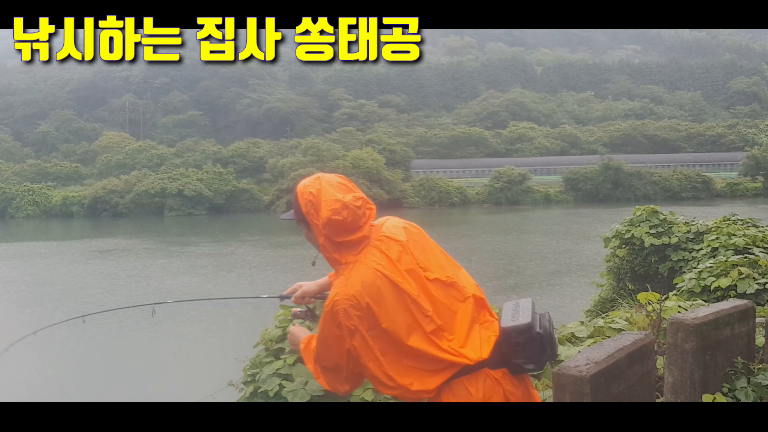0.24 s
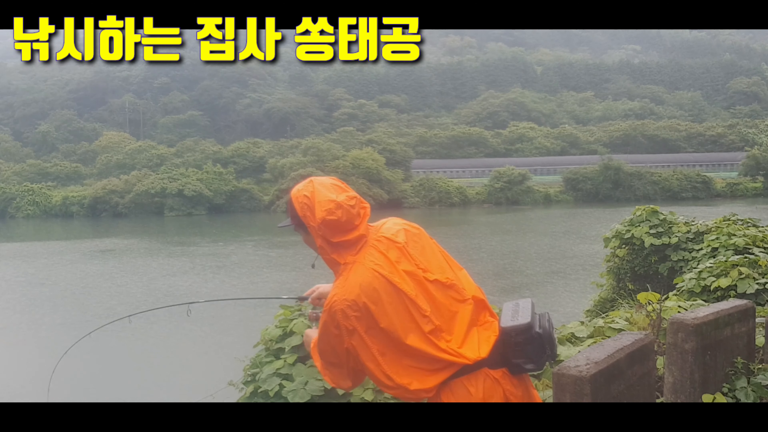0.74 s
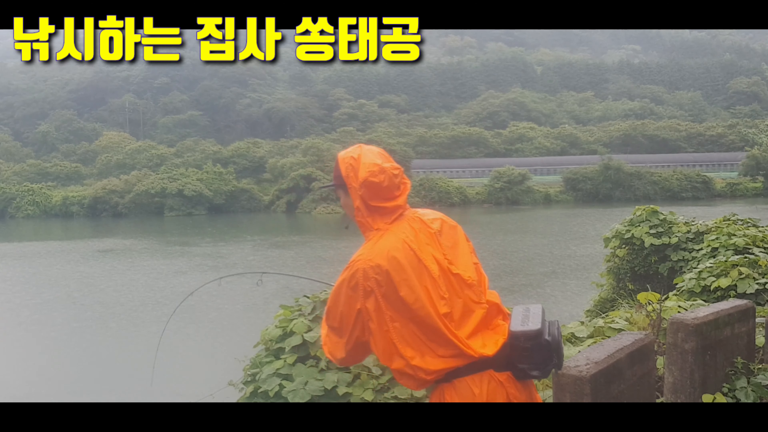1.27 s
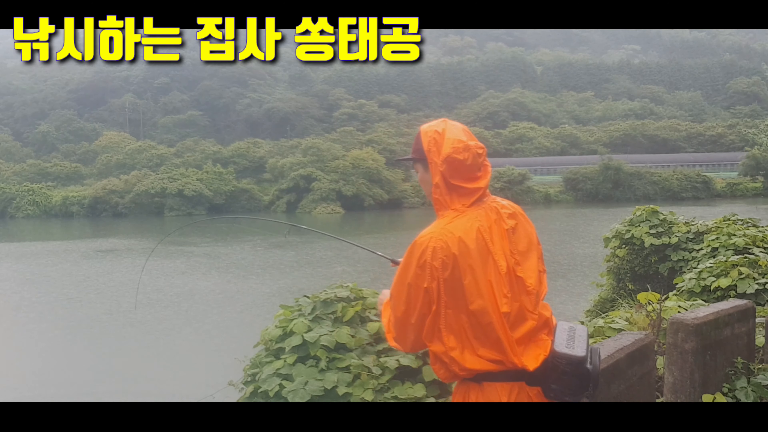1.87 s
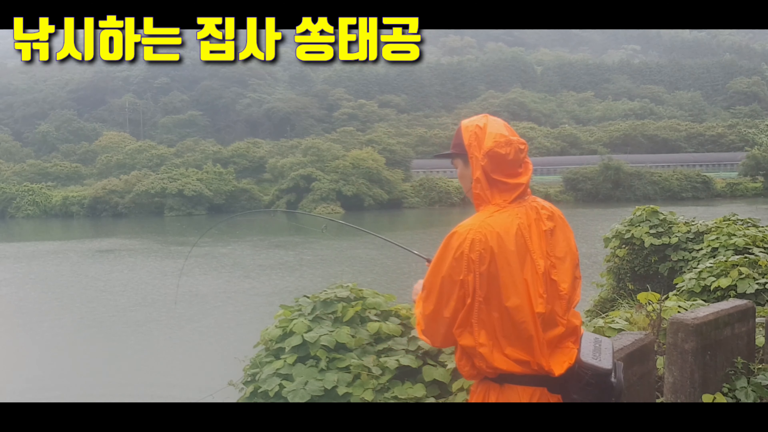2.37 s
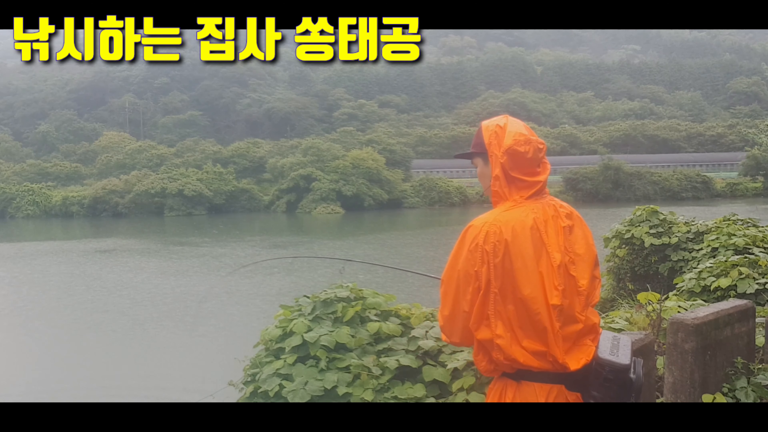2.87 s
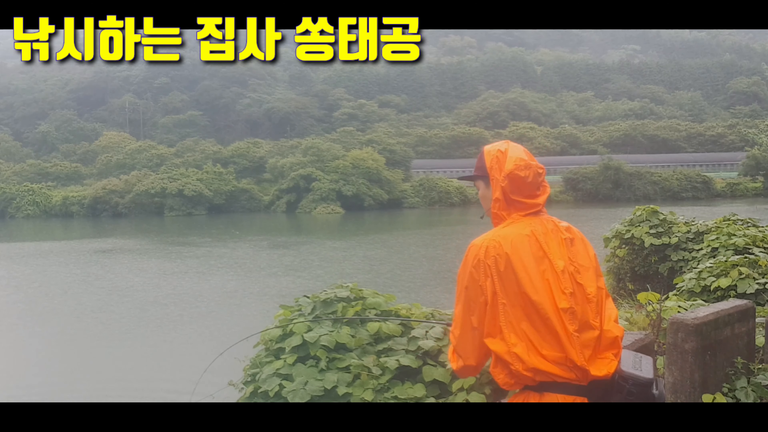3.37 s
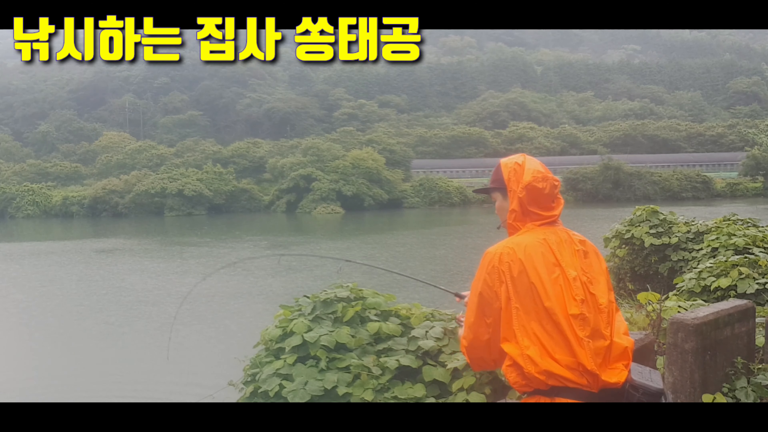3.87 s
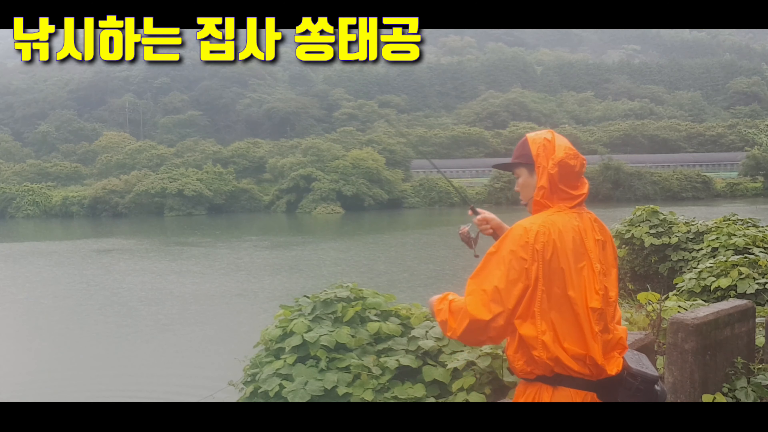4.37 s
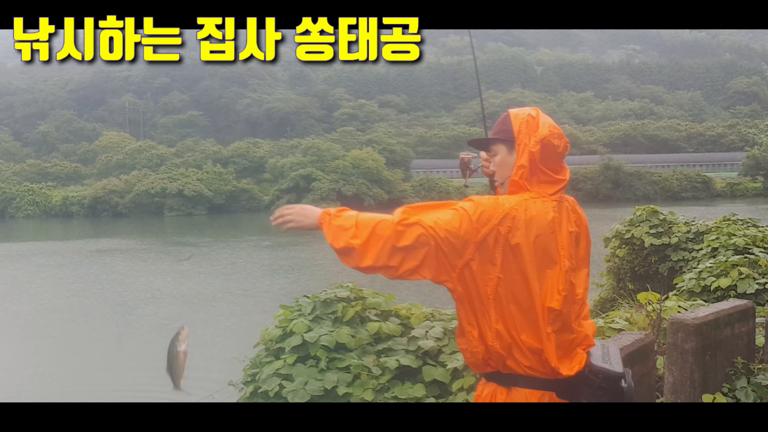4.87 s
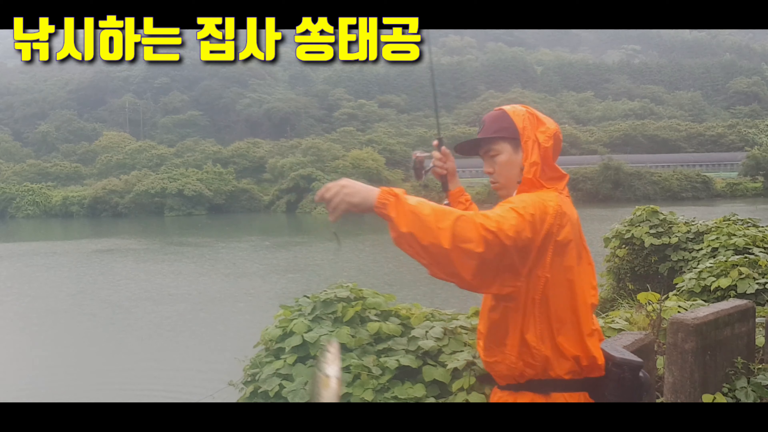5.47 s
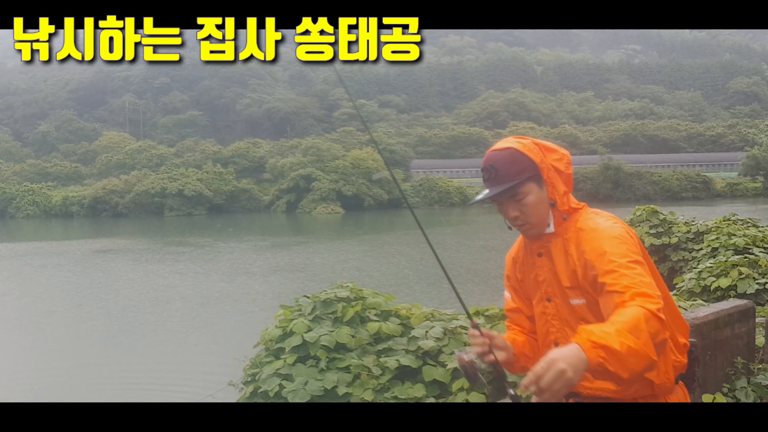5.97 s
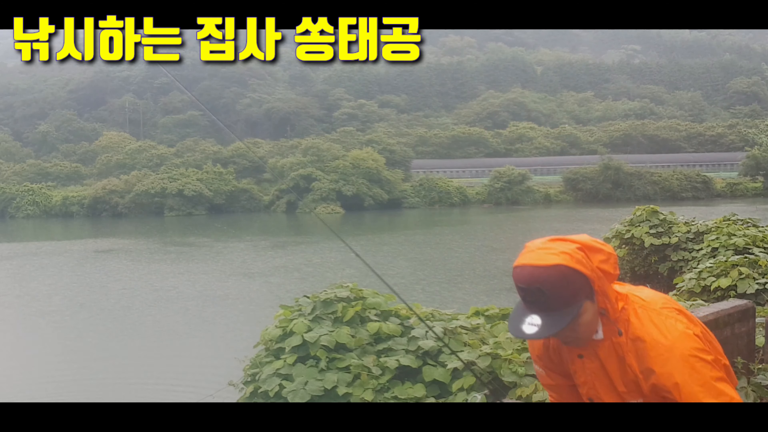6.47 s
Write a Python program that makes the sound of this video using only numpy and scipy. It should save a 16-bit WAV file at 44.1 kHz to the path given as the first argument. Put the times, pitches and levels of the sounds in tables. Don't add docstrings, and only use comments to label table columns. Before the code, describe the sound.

Steady rain throughout, almost constant in level, muffled and watery around the left microphone and lighter, hissier at the right. From 0 s a fishing reel's drag clicker chatters in thin, very bright metallic ticks with a faint spool ring, uneven until 0.5 s; a short gap, then it resumes at 0.75 s and accelerates to a fine fast buzz at about 1.3-1.7 s. It eases to a steady whirr, slows to rattling near 2.7-2.9 s, runs again at 3.05-3.6 s, then breaks into scattered single ticks until 4.8 s. Raindrops strike the camera housing very close: a knock at 0.44, sharp loud taps at 0.86 and 1.02, a cluster around 2.8-3.2, one at 3.7 with a tiny faint plink soon after, lighter taps through 4-6, then loud 6.2 and a duller 6.55. Soft low thuds underneath.

```python
import sys
import numpy as np
from scipy import signal
from scipy.fft import rfft, irfft
from scipy.io import wavfile
from scipy.ndimage import uniform_filter1d

SR = 44100
rng = np.random.default_rng(int(sys.argv[2]) if len(sys.argv) > 2 else 0)


def gain_from_db(level_db):
    decades = np.asarray(level_db, float) / 20
    return 10 ** decades


def dump_mix(stems):
    frames = np.atleast_2d(stems).T
    limited = np.clip(frames, -1, 1)
    pcm = np.round(limited * 32767).astype(np.int16)
    wavfile.write(sys.argv[1], SR, pcm)


N = 296352

# f/Hz, level/dB per Hz
LEFT_PORT = [(28, -108), (60, -95), (170, -93), (300, -89), (750, -78.5), (1050, -83.5), (1700, -77),
             (2800, -83), (3800, -91), (5000, -101), (7800, -127), (10700, -114), (13500, -107),
             (15300, -107)]
# f/Hz, level/dB per Hz
RIGHT_PORT = [(28, -112), (60, -101), (300, -99), (520, -93), (750, -94), (1150, -95), (1750, -99),
              (2200, -96), (5000, -96.5), (6500, -103), (7800, -109), (10700, -96), (12000, -98),
              (15300, -105)]
# f/Hz, share/1
SHARED_RAIN = [(60, 0.91), (300, 0.58), (600, 0.44), (1200, 0.11), (2500, 0.62), (6000, 0.028)]
# t/s, level/dB
SHOWER = [(0.0, -51), (0.3, -51), (0.88, -51), (1.29, -53), (2.28, -51.5), (2.58, -53), (3.61, -51),
          (3.93, -52), (4.3, -52), (5.28, -51.5), (5.67, -51.5), (6.72, -50.5)]
# t/s, upper peak level/dB, upper f/Hz, lower peak level/dB, lower f/Hz
HEAVY_DROPS = [(0.4396, -28.5, 2010, -27.5, 740), (0.8625, -10.5, 2370, -39.5, 1180),
               (1.0152, -9.5, 1970, -16, 1030), (2.801, -20, 2620, -29.5, 1270),
               (2.936, -35.5, 2246, -31, 592), (3.1592, -17, 1760, -29, 920),
               (3.1652, -25.5, 3130, -35, 1900), (3.1693, -35, 1960, -38, 780),
               (3.68, -25, 2430, -27.5, 1260), (6.1817, -10.5, 2320, -36, 940),
               (6.5515, -18, 2420, -26.5, 1290)]
# t/s, upper peak level/dB, upper f/Hz
LIGHT_DROPS = [(0.3496, -33, 2130), (1.6446, -36, 2030), (1.8256, -34, 2210), (2.39, -33, 2200),
               (2.891, -33, 1840), (3.2234, -32, 2050), (3.755, -34.5, 2140), (4.2812, -31, 2360),
               (4.687, -38, 1970), (5.059, -30.5, 2310), (5.236, -31, 1980), (5.6212, -29.5, 2120),
               (5.945, -37, 3520)]
# t/s, peak level/dB, f/Hz
SOFT_DROPS = [(0.019, -64, 427), (0.289, -53.5, 343), (0.706, -51.5, 322), (1.365, -56.5, 320),
              (1.619, -77, 323), (2.299, -56, 320), (2.939, -36, 288), (2.954, -39, 219),
              (2.975, -41.5, 202), (4.652, -57, 367), (5.103, -55, 305), (5.165, -55, 423),
              (5.25, -55.5, 318), (5.302, -52, 266), (5.94, -50.5, 323), (6.033, -70, 390),
              (6.091, -52, 332), (6.332, -58, 400), (6.456, -53, 247), (6.59, -56, 260)]
# t/s, peak level/dB
ROCKING_DROPS = [
    (0.019, -59),
    (0.439, -48.5),
    (1.017, -46.5),
    (1.628, -64),
    (2.497, -60),
    (2.937, -42.5),
    (5.151, -64),
    (5.815, -58),
    (6.465, -61),
    (6.548, -70),
]
# f/Hz, level/dB, t60/s
SHELL_MODES = [(260, -5, 0.035), (352, -0.5, 0.068), (440, 8, 0.015), (573, 12, 0.025)]
# t/s, peak level/dB
SINGLE_CLICKS = [(2.9474, -54), (2.962, -41), (2.9743, -48), (3.5833, -44), (3.6075, -46), (3.626, -44),
                 (3.6463, -41), (3.6592, -54), (3.6794, -42), (3.6877, -45), (3.7135, -41), (3.7406, -41),
                 (3.7656, -41), (3.7779, -55), (3.8375, -38), (3.851, -45), (4.0144, -43), (4.2063, -39),
                 (4.2305, -57), (4.312, -36), (4.3354, -54), (4.5959, -39), (4.6029, -52), (4.7876, -39),
                 (4.8061, -58)]
# t/s, click rate/(1/s), click level/dB, spool ring level/dB
LINE_PULLS = [
    [(.001, 70.7, -42, 2), (.13, 97, -48.5, 9), (.18, 176, -44.5, 5), (.28, 120, -41, 0),
     (.34, 75, -40.5, 2), (.42, 90, -39, -1.5), (.51, 57, -52, .1)],
    [(.75, 73, -41, -5), (.8, 105, -39, -5), (.86, 107, -39, -1), (.92, 65, -42.5, .1), (1., 190, -53, 5),
     (1.1, 250, -56, -5)],
    [(1.1, 233, -54.5, 0), (1.28, 277, -48.5, 3), (1.44, 315, -48, -4), (1.52, 315, -51.5, -7),
     (1.7, 250, -48, 0.5), (2.05, 165, -44.5, -3.5)],
    [(2.05, 176, -49, -4), (2.2, 176, -44.5, 2), (2.4, 189, -45.5, -4), (2.57, 170, -45, 0),
     (2.66, 74, -43, -7), (2.9, 74, -43, -4)],
    [(3.05, 140, -49, -10), (3.14, 200, -52.5, -2), (3.22, 192, -53, -3), (3.4, 80, -43, 0),
     (3.575, 120, -42.5, -7)],
]
# from f/Hz, to f/Hz, level/dB
SPRING_BANDS = [(10500, 11700, -4.5), (13600, 15000, 0.5), (14870, 15700, 5)]
# f/Hz, level/dB
FAINT_FLOOR = [(4500, -13.), (5000, -9.5), (6500, -9.5), (8000, -7), (9300, -6), (10200, -8), (13500, -28)]


def on_log(table, hz):
    table_hz, value = np.array(table)[:, 0], np.array(table)[:, 1]
    return np.interp(np.log(hz + 1), np.log(table_hz), value)


def in_time(table):
    s, *columns = np.transpose(table)
    return [np.interp(np.arange(N) / SR, s, c) for c in columns]


def unit(x):
    return x / np.sqrt(np.mean(x ** 2))


def walk(rate_hz):
    k = int(SR / rate_hz)
    held = np.repeat(rng.standard_normal(size=400), k)[:N]
    w = uniform_filter1d(uniform_filter1d(held, k), k)
    return w / w.std()


def ring(x, hz, t60_s):
    pole = np.exp(2j * np.pi * min(hz, 0.45 * SR) / SR - np.log(1000) / (t60_s * SR))
    return signal.lfilter([1], [1, -pole], x).imag


def pulses(s, db):
    x = np.zeros(N)
    at = np.clip((np.asarray(s) * SR).astype(int), 0, N - 1)
    np.add.at(x, at, gain_from_db(np.asarray(db)))
    return x


def patter(rate_hz, spread_db, hiss):
    c = rng.random((N, 3))
    lands = c[:, 0] < rate_hz / SR
    sign = np.sign(c[:, 1] - 0.5)
    size = gain_from_db(spread_db * np.minimum(-np.log(1 - c[:, 2]), 6))
    return unit(unit(lands * sign * size) + hiss * rng.standard_normal(N))


def rain():
    left_lag_s, gust_db = 0.000472, 0.5
    hz = np.fft.rfftfreq(N, 1 / SR)
    share = np.clip(on_log(SHARED_RAIN, hz), 0, 1)
    both = rfft(patter(rate_hz=2500, spread_db=0.5, hiss=1.5))
    shower_db = in_time(SHOWER)[0]
    shower_db = shower_db - shower_db.mean() + gust_db * walk(7.2)
    out = np.zeros((2, N))
    for ch, (port, lag_s) in enumerate(((LEFT_PORT, left_lag_s), (RIGHT_PORT, 0))):
        own = rfft(patter(rate_hz=2500, spread_db=2.0, hiss=1.06))
        delayed = both * np.exp(-2j * np.pi * hz * lag_s)
        mix = np.sqrt(share) * delayed + np.sqrt(1 - share) * own
        mix = mix * gain_from_db(on_log(port, hz)) * np.sqrt(SR / 2)
        for octave in np.arange(5, 15):
            band = np.clip(1 - abs(np.log2(np.clip(hz, 32, 16384)) - octave), 0, 1)
            flicker_db = np.interp(octave, (7.5, 10.5), (2.2, 0.6))
            out[ch] += irfft(mix * band, N) * gain_from_db(shower_db + flicker_db * walk(12))
    return out


def drip():
    start_s, length_s, level_db = 3.845, 0.049, -61
    base_hz, rise_hz = 4430, 250
    u = np.clip((np.arange(N) / SR - start_s) / length_s, 0, 1)
    hz = base_hz + rise_hz * np.sin(u * np.pi / 2)
    swell = np.sin(np.pi * np.sqrt(u))
    return gain_from_db(level_db) * swell * np.sin(2 * np.pi * np.cumsum(hz) / SR)


def cluster(modes, floor_hz, top_hz):
    push = np.arange(2600) == 48
    x = sum(gain * ring(push, hz, t60_s) for hz, gain, t60_s in modes)
    x = signal.sosfilt(signal.butter(4, floor_hz, "high", fs=SR, output="sos"), x)
    x = signal.sosfilt(signal.butter(5, top_hz, fs=SR, output="sos"), x)
    return x / abs(x).max()


def upper_ring(hz, flat, c):
    modes = [(hz, 1, 0.0068 + 0.0047 * flat),
             (hz * (0.854 + 0.025 * c[0]), 0.5, 0.012 + 0.0079 * flat),
             (hz * (1.05 + 0.065 * c[1]), 0.7, 0.007),
             (hz * 1.237, 1.1 - 1.7 * flat, 0.004),
             (hz * 1.55, 0.37 * (1 - flat) ** 2, 0.003)]
    return cluster(modes, 0.61 * hz, 4700 - 1200 * flat)


def lower_ring(hz, c):
    modes = [(hz, 1, 0.015), (hz * (1.05 + 0.3 * c[2]), 0.8, 0.011), (hz * 0.94, 0.5, 0.012)]
    return cluster(modes, 0.76 * hz, 2320)


def housing():
    light_low_db, light_low_ratio = -22.5, 0.414
    boom_hz = 155.3
    near, body = np.zeros(N + 2600), np.zeros(N + 2600)
    t = np.arange(2600) / SR
    light = [(s, db, hz, db + light_low_db, hz * light_low_ratio) for s, db, hz in LIGHT_DROPS]
    hits = HEAVY_DROPS + light
    chance = rng.random((len(hits), 4))
    shell = cluster([(hz, gain_from_db(db), t60_s) for hz, db, t60_s in SHELL_MODES], 121, 970)
    for (s, db, high_hz, low_db, low_hz), c in zip(hits, chance):
        shell_db = low_db - 16 - 13.5 * np.log2(high_hz / 2200) - 15 * np.log2(low_hz / 1000)
        db = db - 4.5 * (db < -28)
        flat = np.clip((low_db - db + 30.5) / 42, 0, 1)
        high = upper_ring(high_hz, flat, c)
        low = lower_ring(low_hz, c)
        crack = np.diff(rng.standard_normal(len(t) + 2), 2) * np.exp(-t / 0.00034)
        splash = gain_from_db(-24.5 - 28 * flat) * crack
        i = int(s * SR)
        near[i:i + len(t)] += gain_from_db(db + 8) * (high + np.roll(splash, shift=53))
        near[i:i + len(t)] += gain_from_db(low_db + 9.5) * np.roll(low, shift=22)
        body[i:i + len(t)] += gain_from_db(shell_db + 15) * shell
    for s, db, hz in SOFT_DROPS:
        i = int(s * SR)
        swell = np.exp(-t / 0.008) * (1 - np.exp(-t / 0.0027))
        body[i:i + len(t)] += gain_from_db(db + 12.5) * np.sin(2 * np.pi * hz * t) * swell
    s, db = np.transpose(ROCKING_DROPS)
    boom = ring(ring(pulses(s, db), boom_hz, 0.047), boom_hz, 0.14)
    near, body = near[:N], body[:N] + gain_from_db(-34) * boom
    far = np.roll(ring(near, 940, 0.0039), 12) * gain_from_db(-46.5) + gain_from_db(-19.5) * np.roll(body, 12)
    return np.array([near + body, far])


def spring(x):
    out = 0
    for low_hz, high_hz, db in SPRING_BANDS:
        band = signal.butter(3, (low_hz, high_hz), "band", fs=SR, output="sos")
        out = out + gain_from_db(db) * signal.sosfilt(band, x)
    return out


def drag_clicks():
    s, db = np.transpose(SINGLE_CLICKS)
    ticks, free_db = pulses(s, db), np.zeros(N)
    for pull in LINE_PULLS:
        rate_hz, click_db, spool_db = in_time(pull)
        span = slice(int(pull[0][0] * SR), int(pull[-1][0] * SR))
        free_db[span] = spool_db[span]
        teeth = np.floor(np.cumsum(rate_hz[span]) / SR)
        at = np.flatnonzero(np.diff(teeth)) + span.start
        c = rng.standard_normal((400, 2))[:len(at)]
        ticks += pulses(at / SR + 0.12 * c[:, 0] / rate_hz[at], click_db[at] + 3.86 * c[:, 1])
    return ticks, free_db


def spool_spin(ticks):
    spin_up_s, full_hz = 0.02, 138
    lag = np.exp(-1 / (spin_up_s * SR))
    speed = signal.lfilter([1 - lag], [1, -lag], ticks > 0, zi=[full_hz / SR])[0]
    return np.clip(speed * SR / full_hz, 0, 1) ** 0.7


def reel():
    ticks, free_db = drag_clicks()
    spin = spool_spin(ticks)
    t = np.arange(3000) / SR
    scrape = np.exp(-t / 0.00038) * (1 - np.exp(-t / 0.00031))
    chatter = signal.fftconvolve(ticks, scrape)[:N] * 2 * rng.standard_normal(N)
    leaves = np.exp(-t / 0.011) * (1 - np.exp(-t / 0.003))
    scatter = spin ** 0.55 * np.sqrt(abs(signal.fftconvolve(ticks ** 2, leaves)[:N]))
    direct = spring(0.4 * ticks + 0.28 * chatter) * gain_from_db(np.array([[-18], [0]]))
    smear = spring(scatter * rng.standard_normal((2, N))) * gain_from_db(np.array([[-35.5], [-24]]))
    out = gain_from_db(20) * (direct + smear)
    # f/Hz, t60/s, level/dB, left port level/dB, loose-seating wobble/dB
    for hz, t60_s, ring_db, left_db, wobble_db in ((4226, 0.07, -51.5, 3.5, 2.5),
                                                   (10155, 0.035, -58, -45, 3)):
        knock = ring(chatter * spin * gain_from_db(free_db), hz, 0.014)
        main, twin = ring(knock, hz, t60_s), ring(knock, hz * 1.014, t60_s)
        tone = np.array([np.roll(main + 0.88 * twin, shift=27), main - 0.84 * twin])
        out = out + gain_from_db(ring_db + np.array([[left_db], [0]]) + wobble_db * walk(9)) * tone
    return out


def scene():
    return rain() + drip() + housing() + reel()


def drop_faint(x):
    low_hz, high_hz = 4570, 13500
    hz, _, z = signal.stft(x, SR, nperseg=1536, scaling="psd")
    power = 2 * abs(z) ** 2 + 1e-18
    top_db = 10 * np.log10(power[1, hz > 13000].mean(axis=0))
    rain_db = np.array([on_log(LEFT_PORT, hz) + 6.5, on_log(RIGHT_PORT, hz) + 3.5])
    floor_db = (rain_db + on_log(FAINT_FLOOR, hz))[:, :, None]
    limit = gain_from_db(floor_db + 0.081 * (top_db - top_db.min())) ** 2
    faint = uniform_filter1d(power, size=7, axis=1) < limit
    faint &= ((hz > low_hz) & (hz < high_hz))[:, None]
    return signal.istft(z * ~faint, SR, nperseg=1536, scaling="psd")[1][:, :N]


def low_pass(x):
    return signal.sosfilt(signal.butter(12, 16830, fs=SR, output="sos"), x)


def record(dry):
    top_cut = signal.ellip(10, 0.2, 42, 15560, fs=SR, output="sos")
    mix = signal.sosfilt(top_cut, drop_faint(dry))
    return low_pass(mix)


dry = scene()
out = record(dry)
dump_mix(out)
```